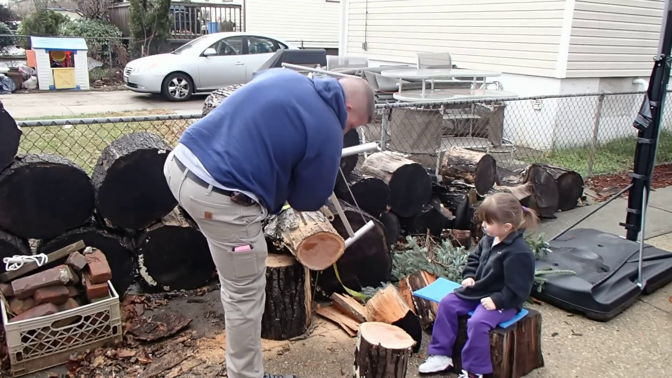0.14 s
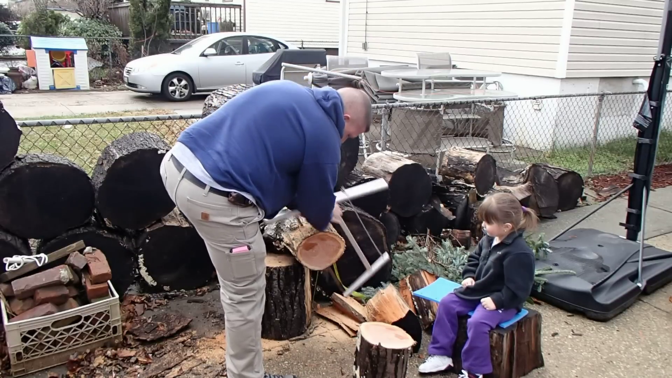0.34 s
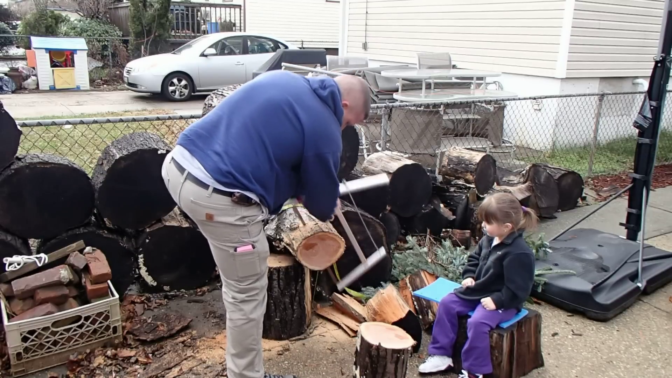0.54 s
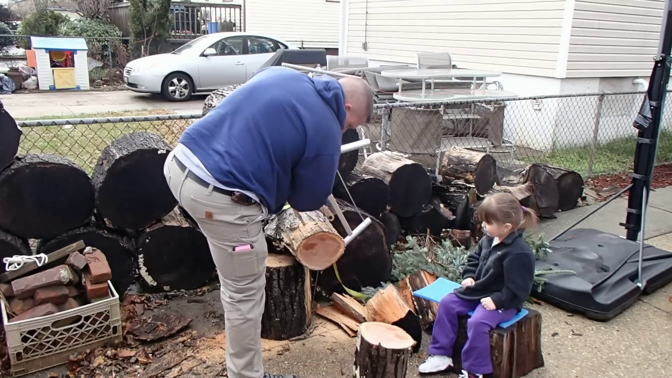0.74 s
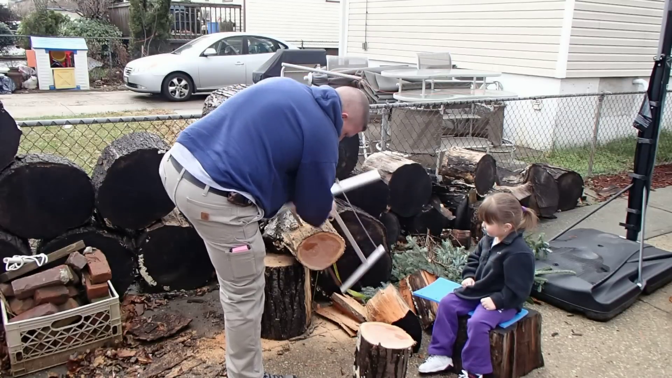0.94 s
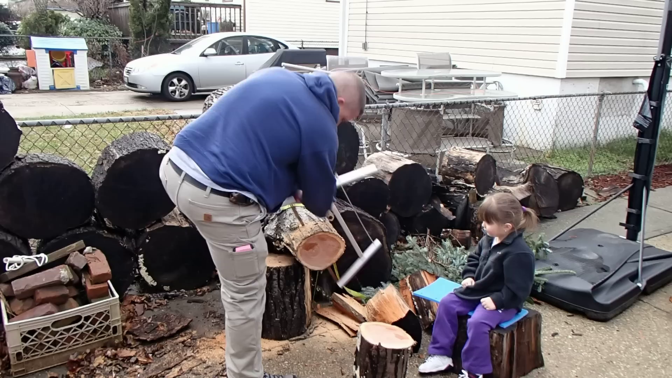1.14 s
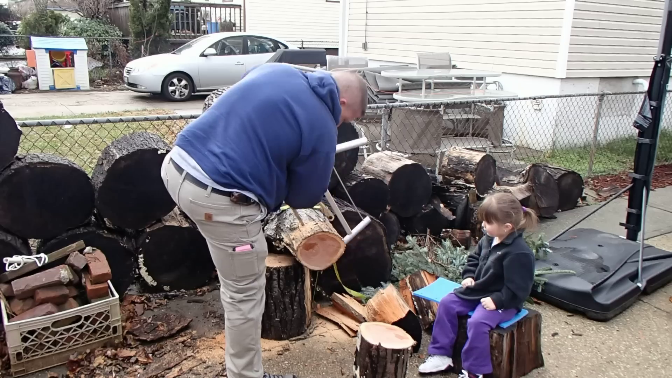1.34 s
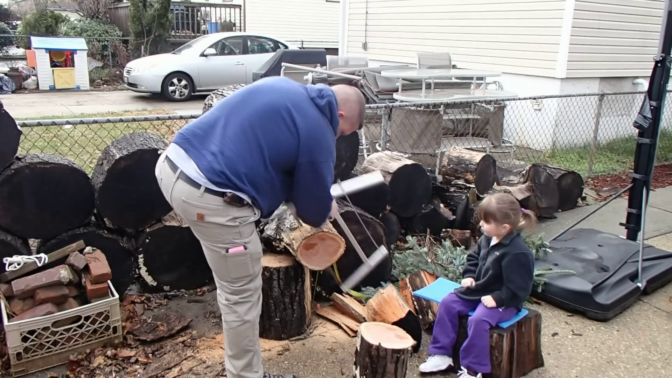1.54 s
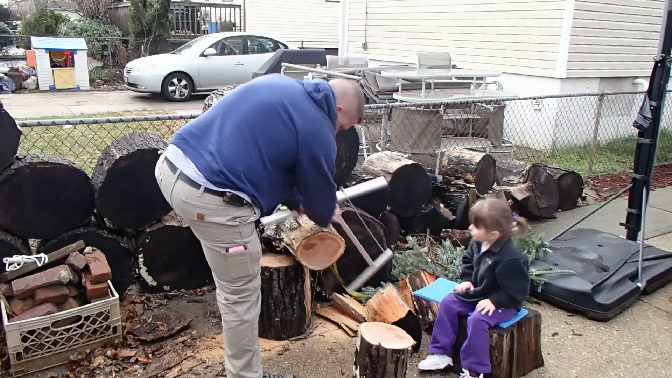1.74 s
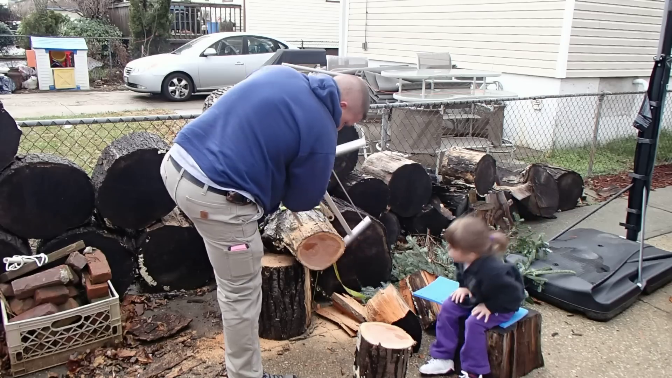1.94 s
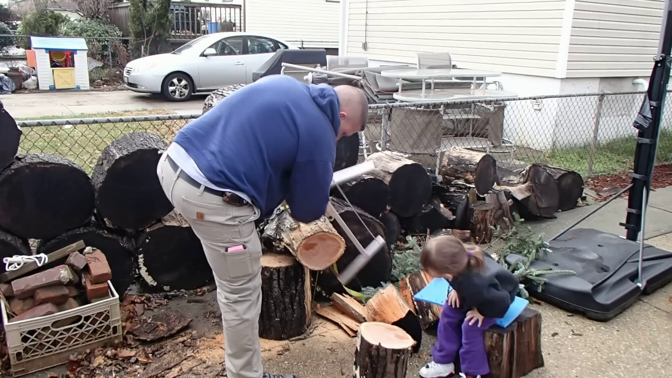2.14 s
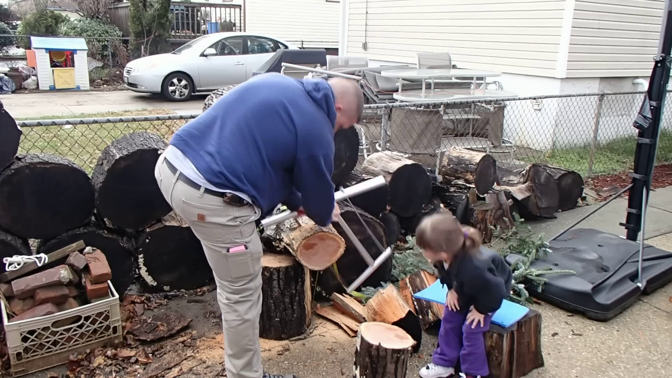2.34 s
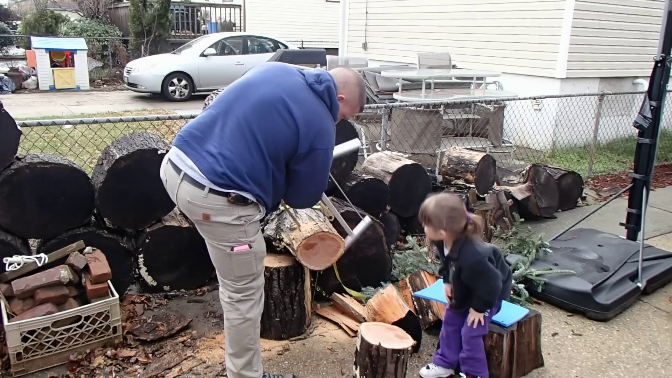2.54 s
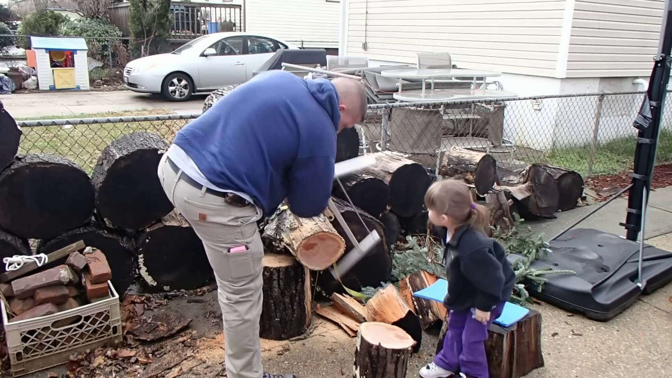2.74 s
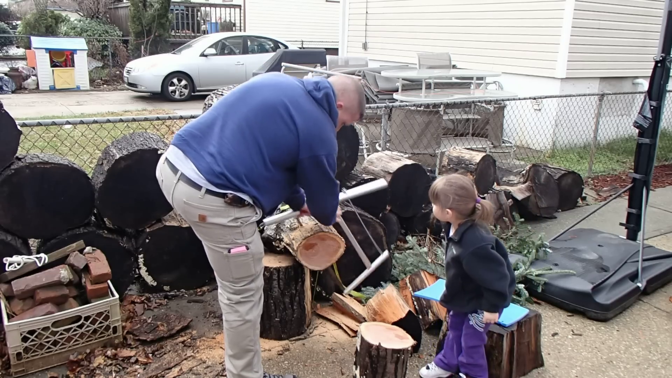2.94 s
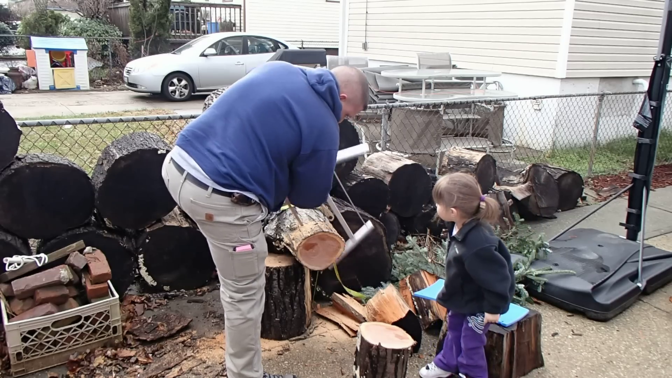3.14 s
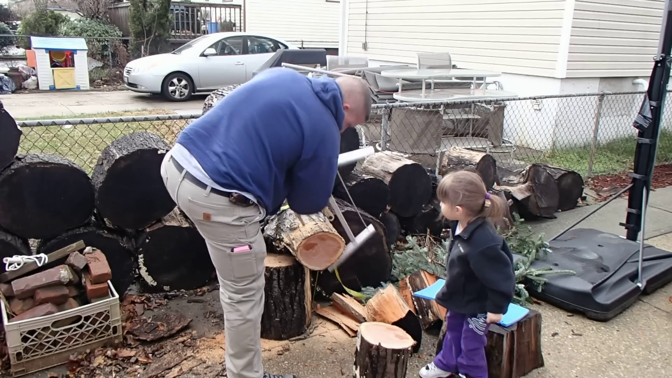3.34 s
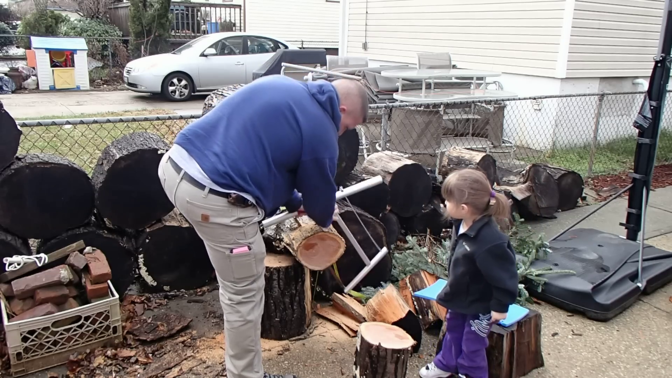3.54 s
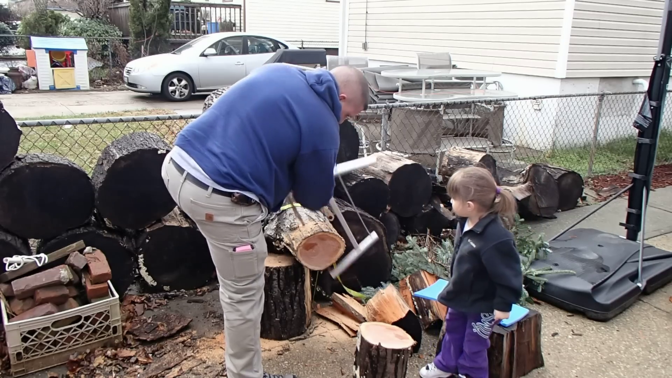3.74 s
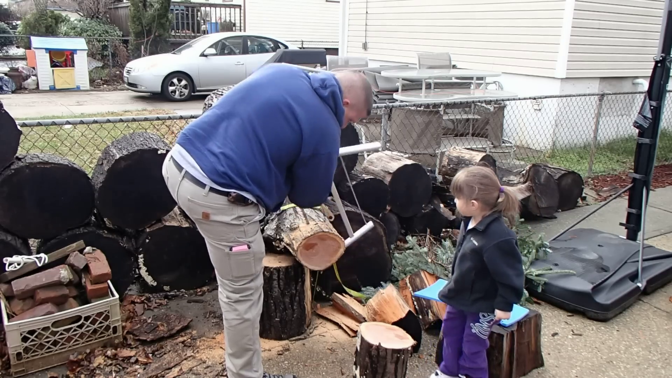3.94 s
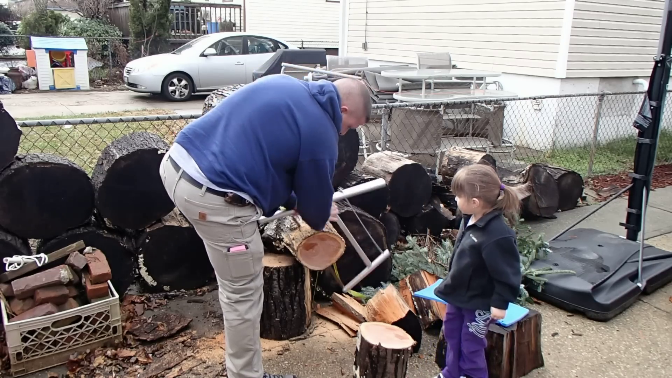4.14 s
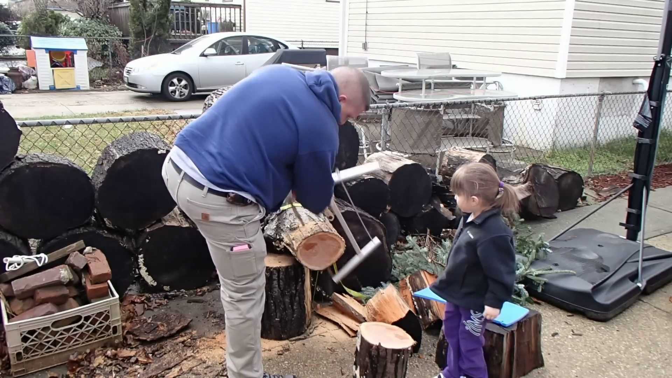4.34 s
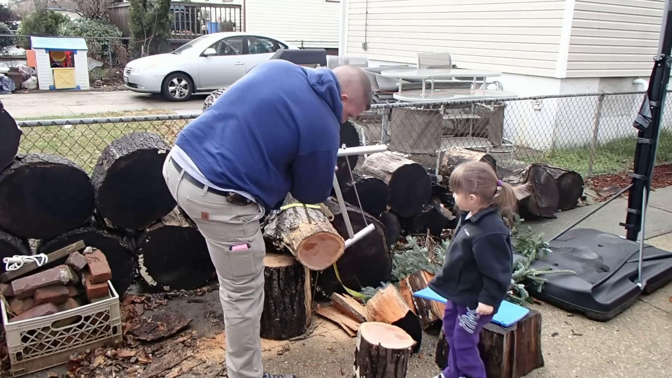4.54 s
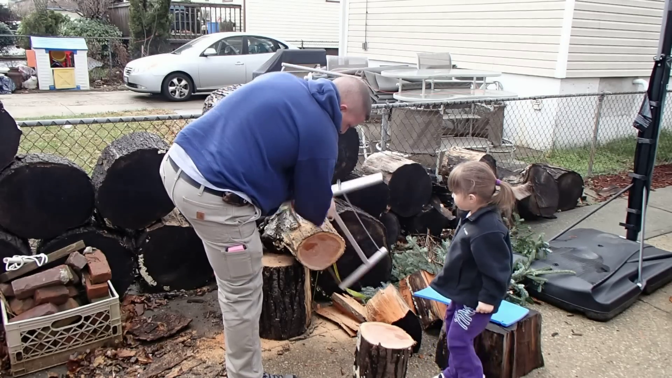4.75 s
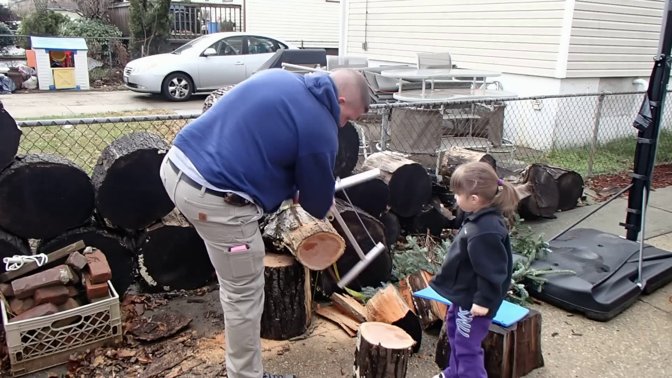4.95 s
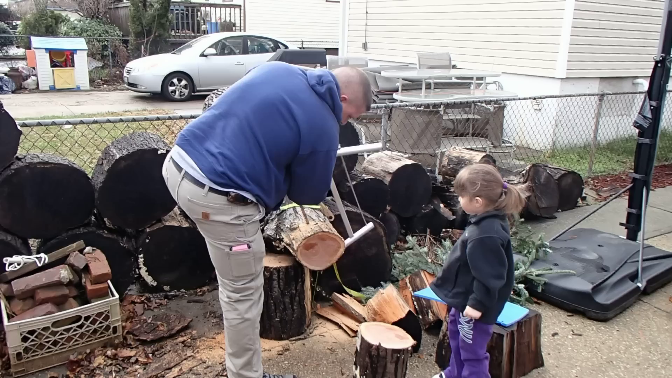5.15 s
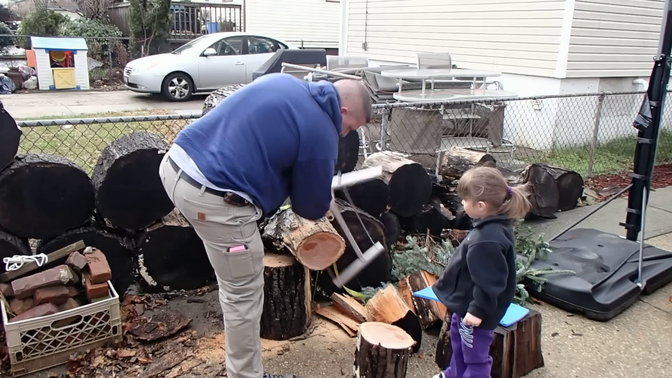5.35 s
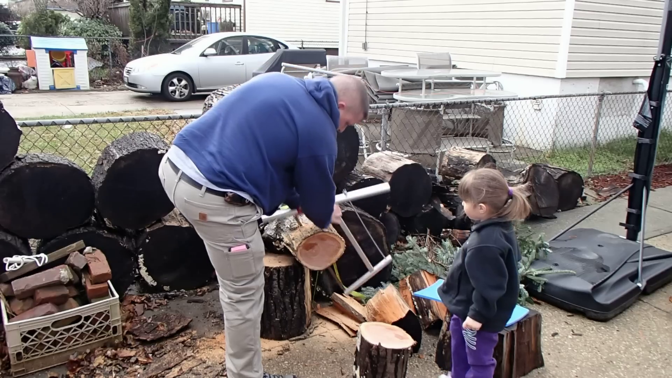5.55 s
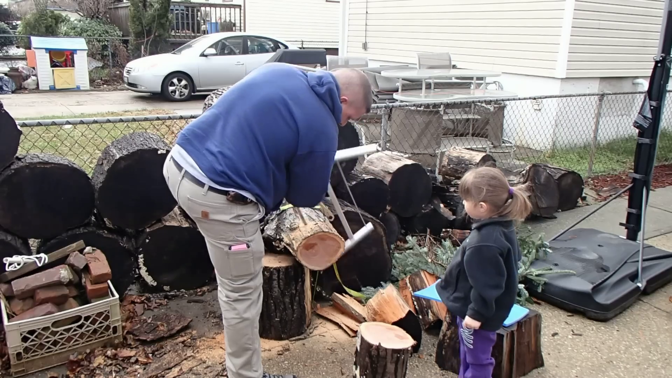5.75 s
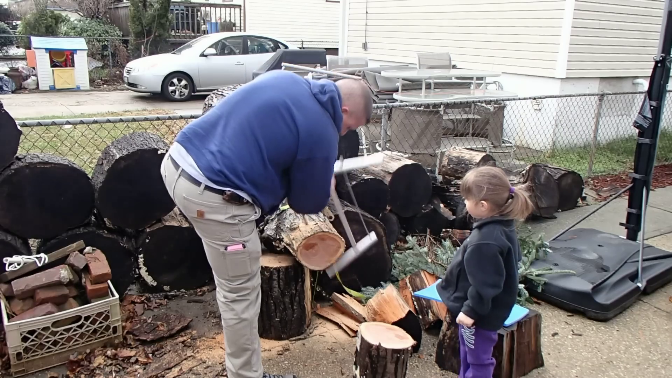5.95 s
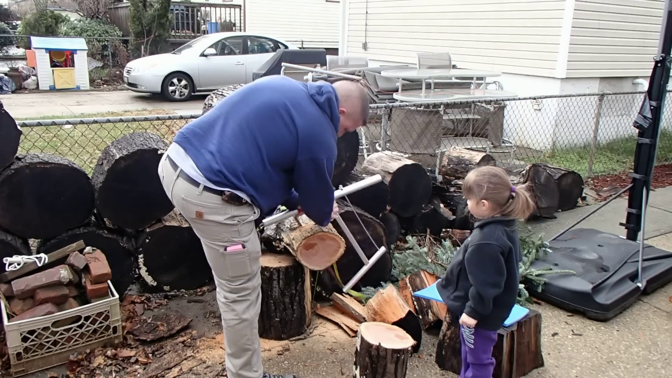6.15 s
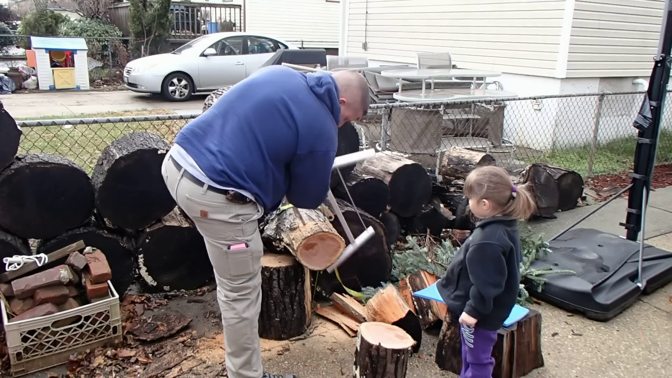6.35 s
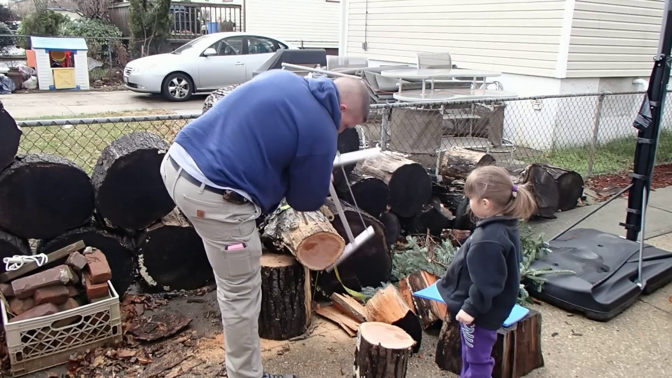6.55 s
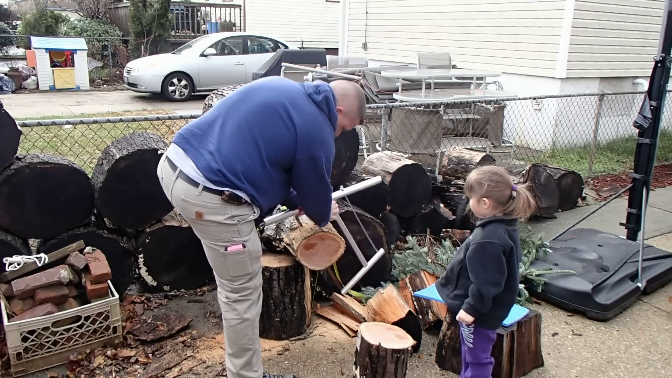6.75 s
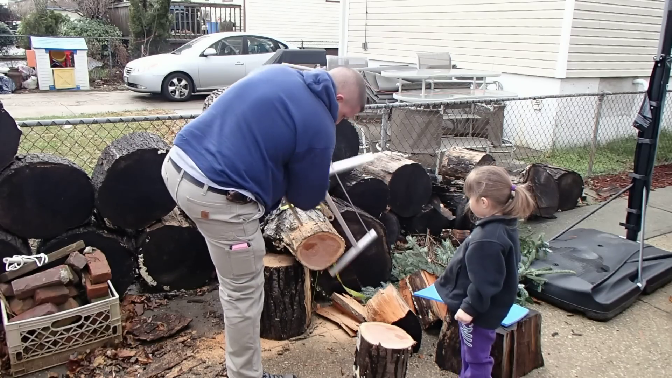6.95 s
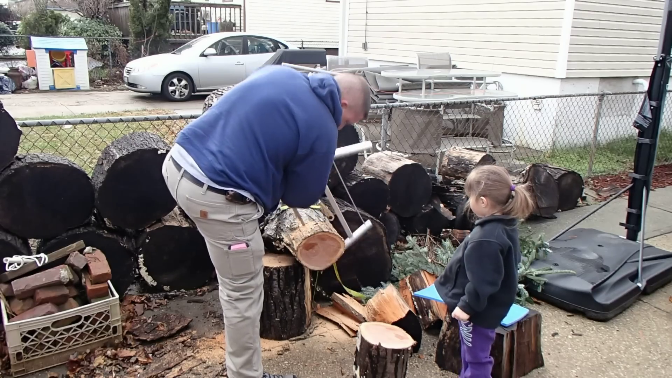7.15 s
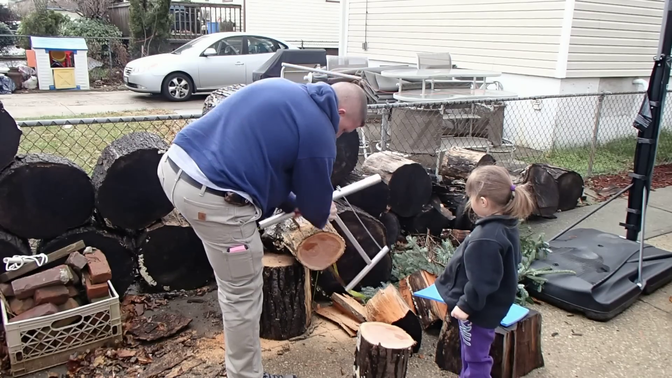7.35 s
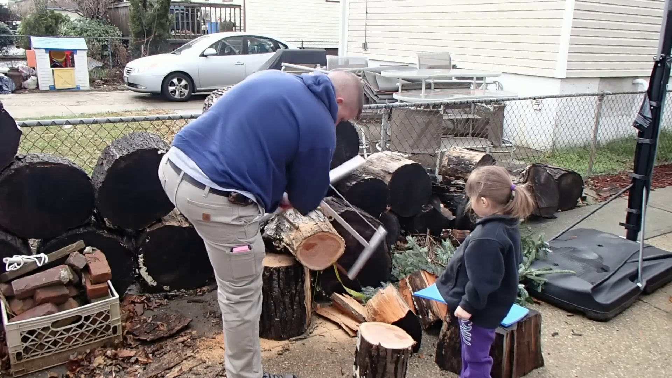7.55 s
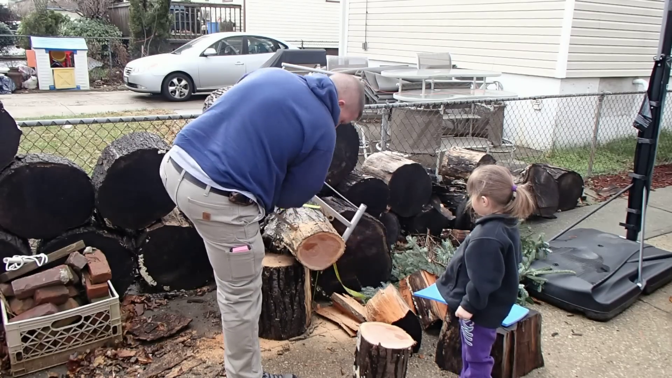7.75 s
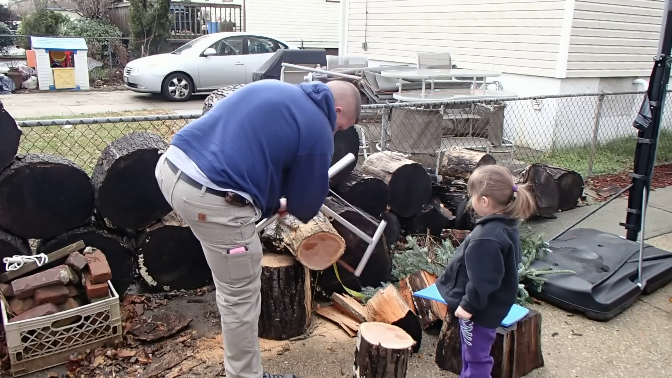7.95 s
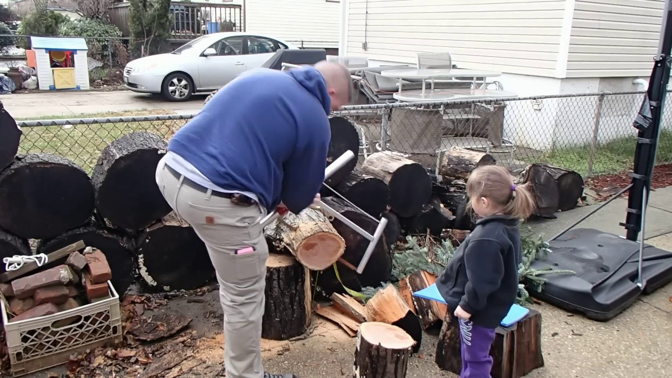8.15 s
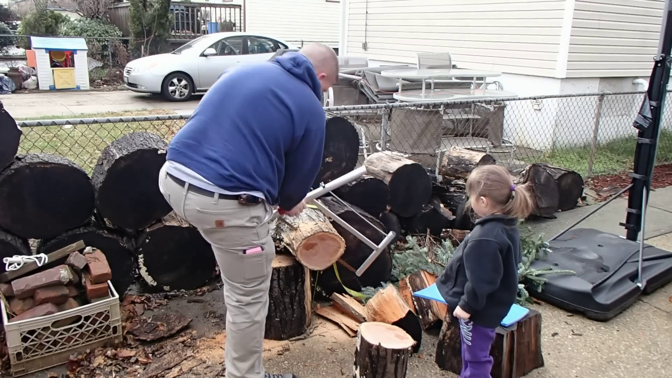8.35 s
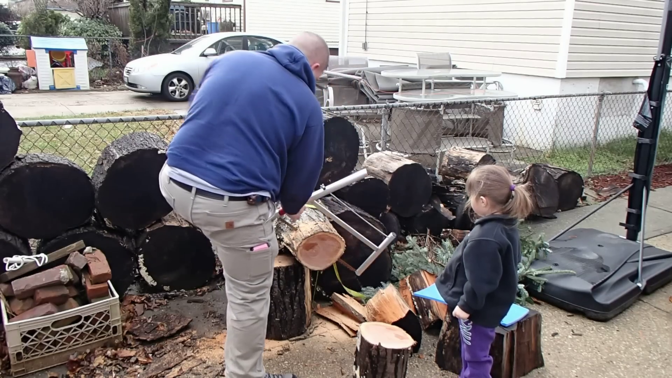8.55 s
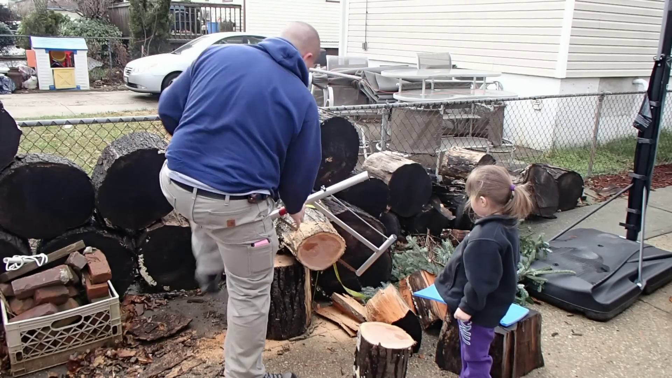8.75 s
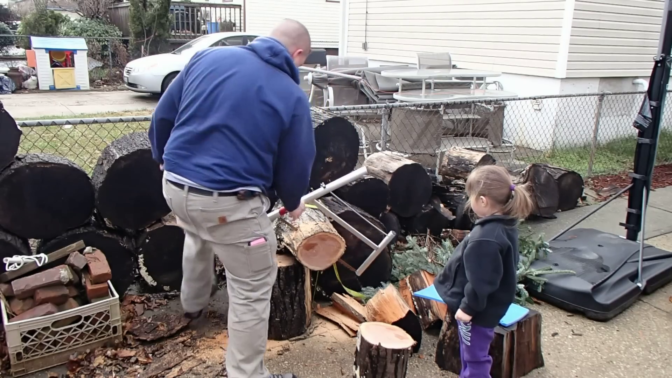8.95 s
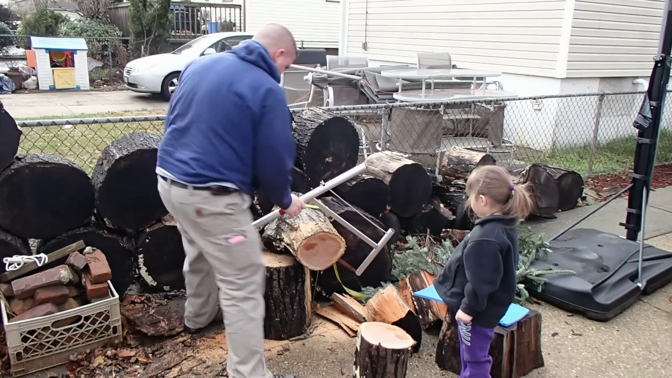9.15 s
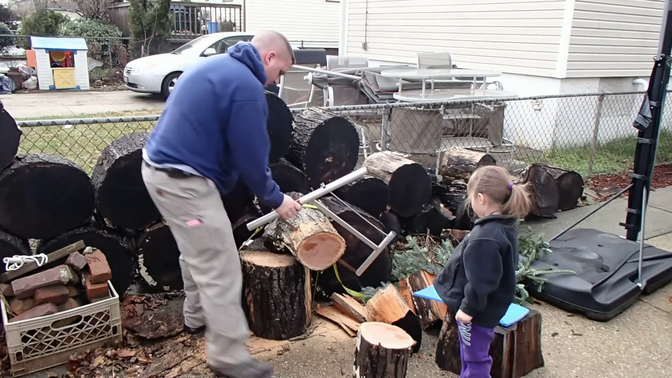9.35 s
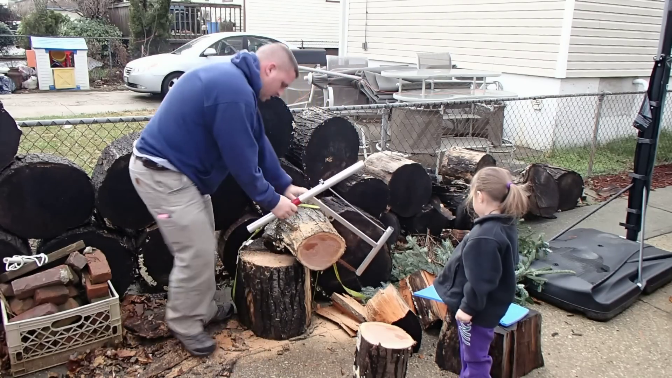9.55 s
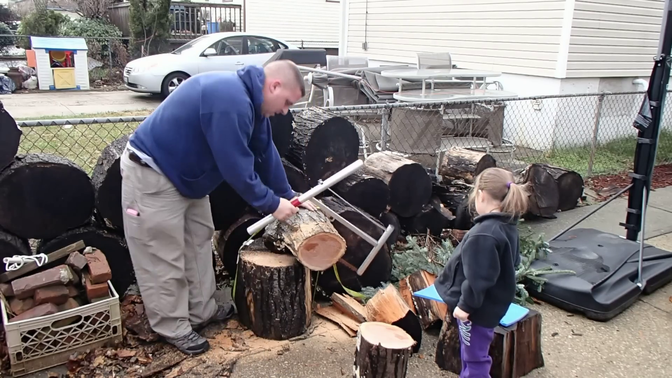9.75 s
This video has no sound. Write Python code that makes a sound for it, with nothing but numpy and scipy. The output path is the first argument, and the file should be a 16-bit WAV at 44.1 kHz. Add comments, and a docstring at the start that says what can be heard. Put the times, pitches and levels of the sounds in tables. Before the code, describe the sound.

A bow saw rasps through a log in a backyard, each hard cut followed by a lighter return, about three cycles every two seconds. The teeth snag and tear the wood, and the thin blade gives brief squeals and a faint ring. After about eight seconds the sawing stops, shoes shuffle softly on dry leaves and chips, and the saw barely starts again. The sound is fairly close, over a faint rumble of distant traffic.

```python
"""A bow saw rasps through a log: a hard cut and a lighter return, about 1.6 cycles a second.
The teeth knock and tear fibres, ringing log, blade and frame; the blade sings on between strokes.
Near 8 s the sawing stops, shoes shuffle on dry litter, and the saw just starts up again.
It all sits in a backyard with a short echo, over the rumble of a distant town."""
import sys
import numpy as np
from scipy import signal
from scipy.fft import rfft, irfft, next_fast_len
from scipy.io import wavfile
from scipy.ndimage import uniform_filter1d, map_coordinates

SR = 44100
rng = np.random.default_rng(int(sys.argv[2]) if len(sys.argv) > 2 else 0)


def store_wav(level_fs):
    """Save 16-bit WAV to argv[1]."""
    pcm = np.round(np.clip(np.atleast_2d(level_fs), -1, 1) * 32767)
    wavfile.write(sys.argv[1], SR, pcm.T.astype(np.int16))


N = 436149
T = np.arange(N) / SR
SIZE = next_fast_len(N, True)
FREQ = np.maximum(np.arange(SIZE // 2 + 1) * SR / SIZE, 1)

# Tone of the town wash. Each row: frequency in Hz, gain in dB.
TOWN_EQ = [(15, -50), (25, -31.5), (53, -9), (91, -6.5), (193, -9.5), (281, -10), (349, -9.5), (457, -14),
           (552, -10), (684, -9), (970, -9), (1950, -18), (3000, -22), (6920, -31), (15500, -31.5)]
# Soft humps in that wash. Each row: centre in Hz, width in Hz, boost in dB.
TOWN_HUMPS = [(322, 124, 6.5), (3660, 330, 6), (4760, 500, 6.5)]
# Far traffic grows a little louder. Each row: time in seconds, rumble level in dB.
TRAFFIC_SWELL = [(0.0, -53.5), (4.4, -53), (6.2, -51), (7.3, -52), (8.2, -49), (9.1, -52), (9.89, -51)]
# A far engine's drone. Each row: time in seconds, pitch in Hz, relative level in dB.
ENGINE_DRONE = [(0, 98, -87), (6, 99.9, -57), (8.2, 97.1, -47.5), (8.9, 100, -51), (9.4, 105.8, -48),
                (9.89, 101, -46.5)]
# Shoes on dry litter. Each row: start in seconds, level in dB, fade in seconds.
SHOE_SCUFFS = [(8.147, -50, .02), (8.26, -51, 0.037), (8.528, -46, 0.008), (8.678, -46, .005),
               (9.018, -42, 0.027), (9.10, -48, 0.053), (9.155, -41.5, 0.026), (9.19, -46, 0.018),
               (9.459, -50, 0.011), (9.545, -36, 0.025), (9.63, -52, .05)]
# Tone of crushed litter. Each row: frequency in Hz, gain in dB.
LITTER_EQ = [(300, -3), (1200, -5), (2200, -0.5), (3300, 0), (4700, 0), (5800, -9), (9000, -18),
             (15500, -18)]
# The frame knocks against the log. Each row: time in seconds, level in dB.
LOG_KNOCKS = [(2.311, -30), (2.546, -24.5), (3.152, -29)]
# Ring of the knocked log. Each row: pitch in Hz, gain in dB, time to fade 60 dB in seconds.
LOG_MODES = [(872, -3, 0.064), (1170, -20, 0.056), (1800, -4, 0.039)]
# The frame clinks as the grip changes. Each row: time in seconds, level in dB.
FRAME_CLINKS = [(8.149, -45), (8.53, -58)]
# Ring of the frame. Each row: pitch in Hz, gain in dB, time to fade 60 dB in seconds.
FRAME_MODES = [(2960, -3.5, 0.21), (5360, -3, 0.084), (6430, -9, 0.11), (7400, -15, .1), (8250, -14, .08)]
# Dry splinters crack off. Each row: time in seconds, level in dB.
SPLINTER_CRACKS = [(.056, -36.5), (.418, -34), (1.256, -37), (1.289, -42), (2.544, -27.5), (5.476, -43),
                   (6.082, -33.5), (6.469, -44)]
# Tone of a splinter. Each row: frequency in Hz, gain in dB.
SPLINTER_EQ = [(1000, -25), (3500, 7), (5200, 9), (9000, -8), (12000, -3), (15000, -1)]
# Tone of the log's deep grind. Each row: frequency in Hz, gain in dB.
GRIND_EQ = [(100, -27), (250, -7.5), (340, -3), (410, -15), (470, 5), (530, -1), (640, -3), (900, -21)]
# The blade binds and squeals. Each row: peak time in seconds, pitch in Hz, level in dB.
BLADE_SQUEALS = [(.314, 1924, -26), (.865, 3230, -24), (.934, 7500, -33.5), (1.064, 1765, -35.5),
                 (1.741, 7838, -44), (2.769, 3170, -25), (3.33, 755, -34.5), (4.032, 3195, -24),
                 (4.07, 410, -40), (4.691, 7950, -34), (5.297, 5254, -19), (5.494, 3875, -35),
                 (5.986, 2790, -31), (6.623, 1685, -32), (7.48, 8300, -44), (7.874, 3195, -29),
                 (7.886, 11000, -38), (9.85, 8400, -45)]
# Free ring of the taut blade. Each row: pitch in Hz, gain in dB, time to fade 60 dB in seconds.
BLADE_MODES = [(2775, -33, 0.1), (3588, -18.5, 0.3), (3750, -24, 0.2)]
# A tooth snags and snaps free. Each row: time in seconds, peak level in dB.
TOOTH_SNAGS = [(2.0655, -9), (2.308, -29), (2.3135, -23), (4.5950, -14), (4.6015, -5), (4.6065, -3),
               (4.6149, -8), (4.664, -8), (5.296, -10), (5.299, -7), (7.862, -7)]
# Brief swells of bright hiss. Each row: peak time in seconds, level in dB.
HISS_FLARES = [(.271, -21.5), (.336, -41), (.489, -39), (.535, -36.5), (.924, -25.5), (1.088, -33),
               (1.13, -34), (1.844, -38), (2.8, -30), (2.958, -41), (3.401, -32), (4.046, -24),
               (4.9, -35.5), (5.392, -35), (5.549, -37), (6.207, -34), (6.811, -35), (7.094, -44),
               (7.48, -46), (7.678, -48)]
# The teeth grab the wood. Each row: start in seconds, level in dB.
TOOTH_GRABS = [(.168, -23), (.419, -36), (1.057, -31), (1.655, -29), (2.066, -18), (2.288, -26),
               (2.305, -18), (3.284, -28), (3.547, -37.5), (4.544, -39), (4.597, -22), (5.494, -26),
               (5.895, -23), (6.531, -22)]
# Broad tone of the rasp. Each row: frequency in Hz, gain on the cut and on the return in dB.
RASP_EQ = [(150, -26.5, -47), (450, -11, -13), (630, -13.5, -13), (874, -2, -5.5), (1050, 1, -5),
           (1580, -8, -5), (2330, -3, -5.5), (3070, -1.5, -1.5), (4010, 2.5, 3.5), (4920, -2.5, -1),
           (7270, -13, -15), (10300, -16, -18), (13400, -16, -16), (15450, -9, -10)]
# Resonances of log, blade and frame. Each row: centre and width in Hz, then boost on the cut
# and on the return in dB.
RASP_MODES = [(736, 56, 8.5, 9.5), (857, 20, 4, 4), (1156, 72, 8, 9.5), (1264, 40.7, 6.5, 10),
              (1700, 110, 9, 1), (1830, 106, 8.5, 6.5), (2000, 50, 3, 6.5), (2363, 45, 0, 7),
              (2870, 36, 0.5, 2.5), (3230, 63, 7, 2), (3390, 60, -1, 4.5), (3603, 61, 8, 5),
              (3762, 110, 5.5, 8.5), (3822, 86, 7.5, 2.5), (3980, 59, 0.5, 4.5), (4220, 140, 5.5, 5),
              (4438, 204, 10, 8.5), (5304, 210, 12.5, 11), (5604, 166, 9, 10), (6000, 100, 4.5, 2),
              (6990, 170, 6, 6), (7730, 123, 12.5, 7), (8180, 350, 9.5, 11), (9180, 270, 4.5, 6.5),
              (11140, 126, 8.5, 13.5), (11680, 160, 9, 7), (12950, 430, 7.5, 6), (13650, 300, 1, 5),
              (14740, 980, 9, 8.5)]
# How the cut follows the arm, with a row for log body, steel rasp and tooth hiss. Each row: exponent
# on speed, gain from leaning in at mid-stroke in dB, rise over the stroke in dB.
CUT_RESPONSE = [(0.82, 26.5, 5), (0.24, 37, -4), (0.48, 33.5, -0.5)]
# How the return follows the arm, with the same rows and columns.
RETURN_RESPONSE = [(1.2, -4.5, -0.5), (1.2, 2.8, 3.5), (1.38, -1.5, -2)]
# Cutting strokes. Each row: start, fastest moment and end in seconds, then in dB the rasp level,
# log body and tooth hiss against the rasp, extra lean, send to the blade ring and deep grind.
CUT_STROKES = [(0.09, 0.269, 0.41, -16.5, -7, -9, -2.5, -5.0, -1.0),
               (0.675, 0.878, 1.058, -17, -7.0, -10, 4, -1.0, -11),
               (1.252, 1.486, 1.69, -18.5, -7, -9, 9.5, 3, -5.0),
               (1.909, 2.096, 2.302, -20.0, -6.0, -9.0, -1, -19, 5),
               (2.517, 2.754, 2.917, -17.5, -5, -9.5, 1.5, -8, 6.0),
               (3.179, 3.362, 3.54, -18.5, -6, -10.0, 2.0, 1, 6),
               (3.865, 4.037, 4.153, -15.5, -6.5, -9.5, -3.0, -2.0, 1),
               (4.525, 4.664, 4.83, -16.5, -7.5, -10.5, -5.5, 6, -1),
               (5.128, 5.297, 5.506, -17.5, -7, -10.0, 1.5, 5, 0.5),
               (5.772, 5.943, 6.116, -17.0, -8.5, -10, -2.0, 5.5, -1.0),
               (6.443, 6.564, 6.75, -17.5, -8.5, -11, -2.5, -1, -11),
               (6.985, 7.185, 7.46, -22.5, -6.5, -9.5, 5, -3.0, -5.0),
               (7.637, 7.855, 7.99, -20.0, -5.5, -9, 2.5, -4.0, -7),
               (9.589, 9.866, 9.86, -33.5, -1.5, -7, 2, -8.0, 0.0)]
# Return strokes. Each row: as for a cut, without the deep grind.
RETURN_STROKES = [(-0.2, -0.055, 0.1, -34.5, -4, -8.5, 2, -3),
                  (0.396, 0.55, 0.71, -29, -8.0, -12, -0.5, -1.0),
                  (1.03, 1.119, 1.304, -29.5, -7.5, -10.5, -2.0, 0.0),
                  (1.611, 1.81, 1.927, -28, -7.5, -11.0, -3.5, -5.0),
                  (2.268, 2.393, 2.573, -31.5, -6, -10.5, -5, 0.0),
                  (2.848, 3.066, 3.194, -30, -5.5, -9.5, 1, -9),
                  (3.494, 3.724, 3.876, -28.5, -6, -12.0, 9, 1.0),
                  (4.158, 4.358, 4.48, -28, -7.0, -12.0, 6, -7),
                  (4.836, 4.985, 5.139, -28.5, -7.5, -13, 0.0, -13),
                  (5.442, 5.648, 5.77, -27.5, -7, -11, 2.5, 0.0),
                  (6.098, 6.28, 6.41, -29.0, -7.0, -10.5, 4.5, 1),
                  (6.744, 6.921, 7.047, -26.5, -8.0, -10.5, 0.0, -4),
                  (7.413, 7.531, 7.69, -33.0, -6.5, -9.5, -8.0, 6)]


def undb(db):
    """Decibels to gain."""
    return np.exp(np.asarray(db) * (np.log(10) / 20))


def unit(x):
    """Scale to rms 1."""
    return x / np.sqrt(np.mean(x ** 2))


def colour(x, points, modes=()):
    """Minimum-phase EQ: a broad (Hz, dB) curve with (Hz, width, dB) resonances on it."""
    hz, db = np.transpose(points)
    grid = FREQ[::20]
    curve = np.interp(np.log(grid), np.log(hz), db)
    for centre, width, peak in modes:
        curve = curve + peak / (1 + (2 * (grid - centre) / width) ** 2)
    cepstrum = irfft(np.log(undb(curve)))
    half = len(cepstrum) // 2
    cepstrum[1:half] *= 2
    cepstrum[half + 1:] = 0
    return signal.oaconvolve(x, irfft(np.exp(rfft(cepstrum))))[:N]


def band(x, lo, hi):
    """The part of a sound between lo and hi Hz, at rms 1."""
    rolloff = np.sqrt((1 + (lo / FREQ) ** 20) * (1 + (FREQ / hi) ** 20))
    return unit(irfft(rfft(x, SIZE) / rolloff, SIZE)[:N])


def walk(rate):
    """Random drift at rms 1, turning `rate` times a second."""
    knots = rng.standard_normal(int(N / SR * rate) + 2)
    return unit(np.interp(T * rate, np.arange(len(knots)), knots))


def grains(rate, spread_db):
    """Crackle of tiny fractures, `rate` a second: many weak, a few strong."""
    size = undb(spread_db * np.minimum(rng.exponential(size=N), 3))
    return unit((rng.random(N) < rate / SR) * size * np.sign(rng.standard_normal(N)))


def bursts(events, fade_s):
    """Envelope of instant attacks with quick fades."""
    t = T[:SR // 10]
    jolts = np.zeros(N)
    for s, db in events:
        i = int(s * SR)
        jolts[i:i + len(t)] += undb(db) * np.exp(-t / fade_s)
    return jolts


def bell(peak_s, length_s):
    """A bell-shaped swell: its samples and its envelope."""
    on = slice(*np.searchsorted(T, [peak_s - 2 * length_s, peak_s + 2 * length_s]))
    return on, np.exp(-2 * ((T[on] - peak_s) / length_s) ** 2)


def town(rumble_db, swell_db, air_db, engine_db):
    """Far traffic swells slowly under a steady wash of air; one engine drones through it."""
    wash = colour(rng.standard_normal(N), TOWN_EQ, TOWN_HUMPS)
    traffic_db = np.interp(T, *np.transpose(TRAFFIC_SWELL))
    rumble = band(wash, 20, 220) * undb(traffic_db + rumble_db + swell_db * walk(8))
    air = band(wash, 220, 15700) * undb(air_db + .5 * walk(7.4))
    s, hz, db = np.transpose(ENGINE_DRONE)
    phase = np.cumsum(np.interp(T, s, hz) * (1 + 0.019 * walk(12))) / SR
    engine = unit(np.sin(2 * np.pi * phase)) * undb(np.interp(T, s, db) + engine_db + 2.3 * walk(8.2))
    return rumble + air + engine


def yard(x, wet_db, t60_s, wall_s, dull_hz):
    """Woodpile, ground and house wall scatter a short, duller tail."""
    t = T[:SR // 2]
    tail = rng.standard_normal(len(t)) * np.exp(-np.log(1000) * t / t60_s) * (t > wall_s)
    tail = signal.sosfilt(signal.butter(1, dull_hz, fs=SR, output="sos"), tail)
    return x + undb(wet_db) * signal.fftconvolve(x, tail / np.linalg.norm(tail))[:N]


def footsteps(press_s):
    """Each scuff crushes a little cloud of dry leaves and chips."""
    t = T[:SR // 4]
    attack = np.minimum(t / press_s, 1)
    weight = np.zeros(N)
    for s, db, fade in SHOE_SCUFFS:
        i = int(s * SR)
        weight[i:i + len(t)] += undb(db) * attack * np.exp(-np.maximum(t - press_s, 0) / fade)
    return weight * unit(colour(grains(rate=2300, spread_db=3.0), LITTER_EQ))


def struck(blows, modes):
    """Short blows ring the fading modes of one object."""
    t = T[:SR // 2]
    taps = np.zeros(N)
    for s, db in blows:
        taps[int(s * SR)] += undb(db)
    ring = sum(undb(db) * np.sin(2 * np.pi * hz * t) * np.exp(-np.log(1000) * t / t60)
               for hz, db, t60 in modes)
    return signal.fftconvolve(taps, ring)[:N]


def splinters(fade_s):
    """Thin chips break with a bright tick, too light to ring the log."""
    return bursts(SPLINTER_CRACKS, fade_s) * unit(colour(rng.standard_normal(N), SPLINTER_EQ))


def log_grind(rasp, grind_db, steepness):
    """Only a hard, deep bite shakes the whole log, so its low grind grows faster than the rasp."""
    force = np.sqrt(np.maximum(uniform_filter1d(rasp ** 2, SR // 40), 1e-12))
    _, fastest, *_, depth_db = np.transpose(CUT_STROKES)
    depth = undb(grind_db + np.interp(T, fastest, depth_db))
    grind = unit(colour(grains(rate=1700, spread_db=4.0), GRIND_EQ))
    return depth * (force / force.max()) ** steepness * grind


def squeals(length_s, waver, rough_db):
    """Stick and slip feed one resonance, which swells and dies with an unsteady pitch."""
    wobble = 1 + waver * walk(300)
    grit = undb(rough_db * walk(250))
    out = np.zeros(N)
    for s, hz, db in BLADE_SQUEALS:
        on, swell = bell(s, length_s)
        tone = np.sqrt(2) * np.sin(2 * np.pi * np.cumsum(hz * wobble[on]) / SR)
        out[on] += undb(db) * swell * grit[on] * tone
    return out


def blade_ring(rasp, waver, beat_db):
    """The rasp feeds the taut blade, which sings on after each stroke as freely as the kerf lets it."""
    freedom, out = np.zeros(N), np.zeros(N)
    for start, fastest, end, _, _, _, _, ring_db, *_ in [*CUT_STROKES, *RETURN_STROKES]:
        on, _ = arm(start, fastest, end)
        freedom[on] = np.maximum(freedom[on], undb(ring_db))
    power = (rasp * freedom) ** 2
    clock = np.cumsum(1 + waver * walk(70)) / SR  # the tension of the blade wavers
    for hz, db, t60 in BLADE_MODES:
        feedback = np.exp(-2 * np.log(1000) / (t60 * SR))
        energy = signal.lfilter([1], [1, -feedback], power + 1e-18)
        out += undb(db) * unit(np.sqrt(energy) * np.sin(2 * np.pi * hz * clock))
    return np.std(rasp) * undb(beat_db * walk(25)) * out


def saw_resonance(drive, side=0):
    """Log, blade and frame colour whatever drives them: side 0 is the cut, 1 the return."""
    return colour(drive, np.array(RASP_EQ)[:, [0, 1 + side]], np.array(RASP_MODES)[:, [0, 1, 2 + side]])


def snags(ring_hz, decay_s, crack):
    """A caught tooth lets go with a very short, bright snap."""
    t = T[:SR // 100]
    envelope = t / decay_s * np.exp(1 - t / decay_s)
    out = np.zeros(N)
    for s, db in TOOTH_SNAGS:
        snap = np.sin(2 * np.pi * ring_hz * t) + crack * rng.standard_normal(len(t))
        i = int(s * SR)
        out[i:i + len(t)] += undb(db) * snap * envelope
    return out


def hiss_flares(length_s):
    """Brief swells of bright hiss above 6500 Hz during the strokes."""
    envelope = np.zeros(N)
    for s, db in HISS_FLARES:
        on, swell = bell(s, length_s)
        envelope[on] += undb(db) * swell
    scrape = saw_resonance(grains(rate=4600, spread_db=3.0))
    highpass = signal.butter(8, 6500, "high", fs=SR, output="sos")
    return envelope * unit(signal.sosfilt(highpass, scrape))


def grabs(fade_s, grip_s):
    """A short burst of rasp as the teeth take hold."""
    hold = np.maximum(uniform_filter1d(bursts(TOOTH_GRABS, fade_s), int(grip_s * SR)), 0)
    return hold * unit(saw_resonance(rng.standard_normal(N)))


def chirps(rate, ring_s, spread_db):
    """Single teeth flick free and ring for a few milliseconds, each at its own pitch."""
    t = T[:SR // 60]
    envelope = (1 - np.exp(-t / .0005)) * np.exp(-t / ring_s)
    when, pitch, size, phase = rng.random((int(rate * N / SR), 4)).T
    hz = 1400 + 14200 * pitch
    gains = undb(spread_db * np.minimum(-np.log(1 - size), 3))
    tones = np.sin((2 * np.pi * (np.outer(hz, t) + phase[:, None])).astype(np.float32))
    out = np.zeros(N + len(t))
    for i, gain, tone in zip((when * N).astype(int), gains, tones):
        out[i:i + len(t)] += gain * envelope * tone
    return unit(out[:N])


def sliding(x, depth_db, rate, width_hz):
    """The contact point slides along the blade, so neighbouring resonances swell and fade in turn."""
    hz, s, frames = signal.stft(x, SR, nperseg=512)
    field = rng.standard_normal((160, 800))
    position = np.meshgrid(hz / width_hz, s * rate, indexing="ij")
    sway = map_coordinates(field, position, order=1, mode="mirror")
    return signal.istft(frames * undb(depth_db * sway), SR, nperseg=512)[1][:N]


def arm(start, fastest, end):
    """The samples of one stroke and the arm's speed on them: from rest up to 1 and back to rest."""
    on = slice(*np.searchsorted(T, [start, end]))
    progress = np.interp(T[on], [start, fastest, end], [0, .5, 1])
    return on, np.maximum(np.sin(np.pi * progress), 0)


def strokes(table, response, side, lean_shape, grain_db, flutter_db, tooth_rate, bite,
            fibre_rate, fibre_db, uneven_db, chirp_db, trim_db):
    """Teeth pass at the speed of the arm; each tears a burst of fibres that rings log and blade."""
    speed, gains = np.zeros(N), np.zeros((3, N))
    for start, fastest, end, rasp_db, body_db, hiss_db, extra_db, *_ in table:
        on, pace = arm(start, fastest, end)
        speed[on] = np.maximum(speed[on], pace)
        slack = (1 - pace ** 2) ** lean_shape  # the weight comes off the blade towards both ends
        travel = (T[on] - fastest) / (end - start)
        for k, ((power, lean_db, rise_db), tone_db) in enumerate(zip(response, (body_db, 0, hiss_db))):
            db = rasp_db + tone_db + trim_db - (lean_db + extra_db) * slack + rise_db * travel
            gains[k, on] = np.hypot(gains[k, on], pace ** power * undb(db))
    wood_db = grain_db * walk(30)  # harder and softer wood passes under the teeth
    body, steel, hiss = [gain * undb(wood_db + flutter_db * walk(32)) for gain in gains]
    tooth_phase = np.cumsum(tooth_rate * (.15 + speed) * (1 + .2 * walk(120))) / SR % 1
    pressure = (1 + bite * np.exp(-tooth_phase / 0.15)) * undb(uneven_db * walk(110) + 0.35 * walk(400))
    tearing = unit(pressure * (grains(fibre_rate, fibre_db) + 0.6 * rng.standard_normal(N)))
    drive = tearing + undb(chirp_db) * chirps(rate=900, ring_s=0.0081, spread_db=3.5)
    rasp = saw_resonance(sliding(drive, depth_db=2.5, rate=24, width_hz=385.4), side)
    return body * band(rasp, 60, 2400) + steel * band(rasp, 2400, 6500) + hiss * band(rasp, 6500, 15700)


def scene():
    """The mono mix: saw and feet up front in the yard, the town behind."""
    cut = strokes(CUT_STROKES, CUT_RESPONSE, side=0, lean_shape=.9, grain_db=.35, flutter_db=.4,
                  tooth_rate=328.4, bite=0.56, fibre_rate=9000, fibre_db=2.5,
                  uneven_db=.7, chirp_db=-5.5, trim_db=-0.34)
    back = strokes(RETURN_STROKES, RETURN_RESPONSE, side=1, lean_shape=1, grain_db=.47, flutter_db=1.04,
                   tooth_rate=301.5, bite=0.48, fibre_rate=10000, fibre_db=1.9,
                   uneven_db=1.0, chirp_db=-6, trim_db=0.0)
    saw = cut + back + grabs(fade_s=0.015, grip_s=0.005) + hiss_flares(length_s=.016)
    saw += snags(ring_hz=4440, decay_s=0.00021, crack=0.081)
    steel = squeals(length_s=.016, waver=0.012, rough_db=3.5) + blade_ring(saw, waver=.0015, beat_db=1.2)
    wood = log_grind(cut, grind_db=-40.5, steepness=1.5) + splinters(fade_s=0.0068)
    knocks = struck(FRAME_CLINKS, FRAME_MODES) + struck(LOG_KNOCKS, LOG_MODES)
    close = saw + steel + wood + knocks + footsteps(press_s=0.0059)
    foreground = yard(close, wet_db=-14.5, t60_s=0.095, wall_s=0.0048, dull_hz=5900)
    background = town(rumble_db=0.5, swell_db=.5, air_db=-46.75, engine_db=-6.0)
    return (foreground + background)[None]


def record(dry):
    """A steep low-pass at 15780 Hz takes off the very top."""
    return signal.sosfilt(signal.ellip(10, .2, 80, 15780, fs=SR, output="sos"), dry)


dry = scene()
out = record(dry)
store_wav(out)
```